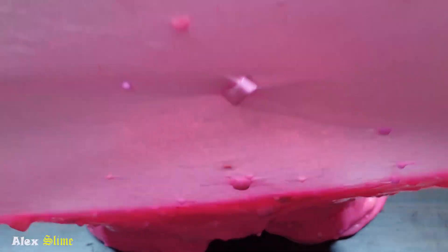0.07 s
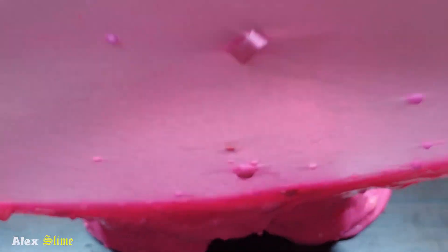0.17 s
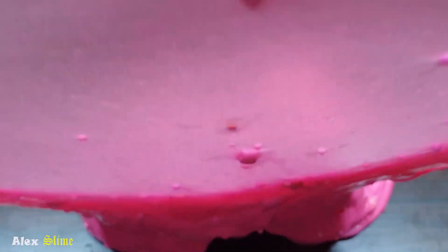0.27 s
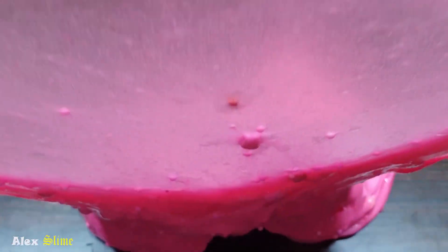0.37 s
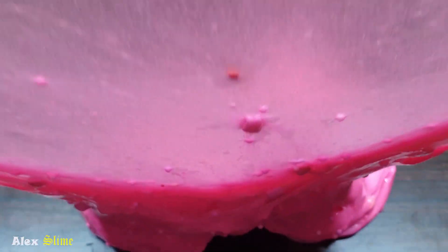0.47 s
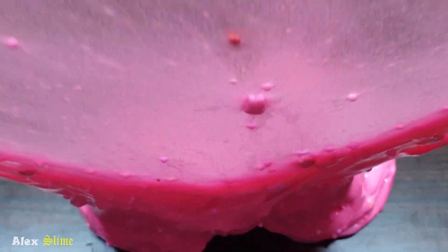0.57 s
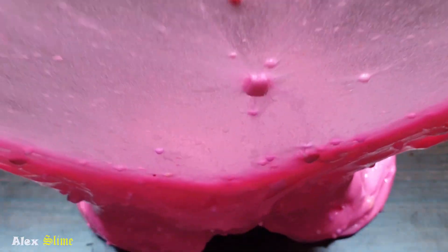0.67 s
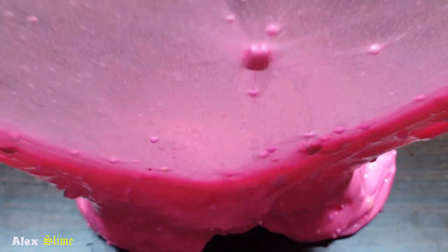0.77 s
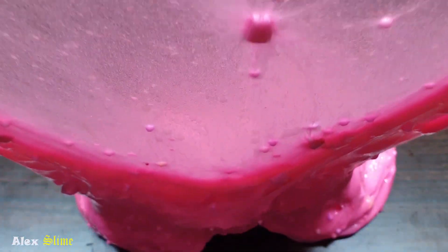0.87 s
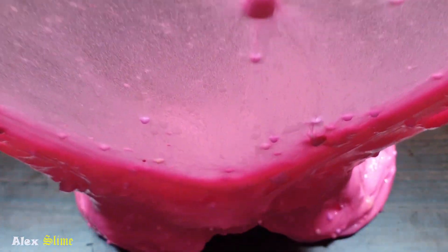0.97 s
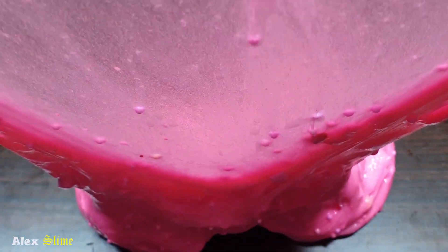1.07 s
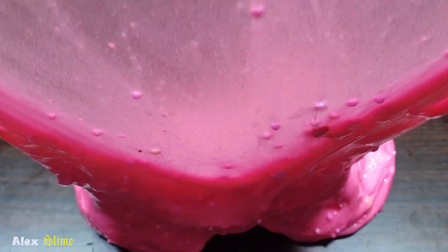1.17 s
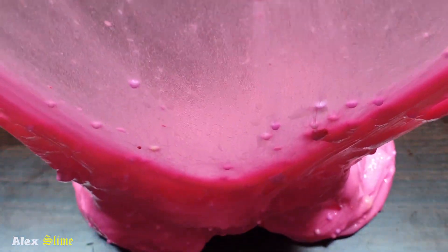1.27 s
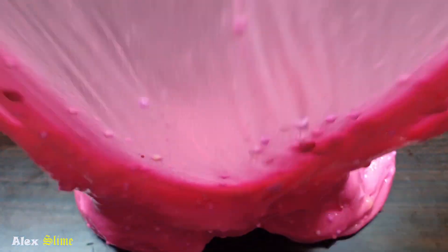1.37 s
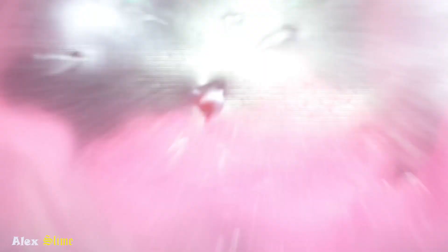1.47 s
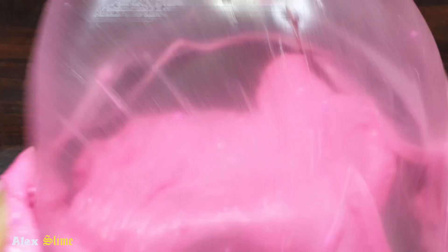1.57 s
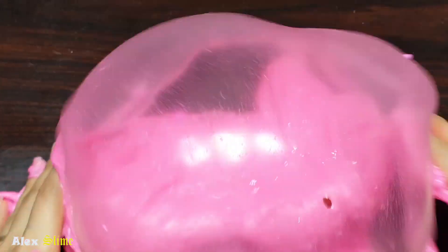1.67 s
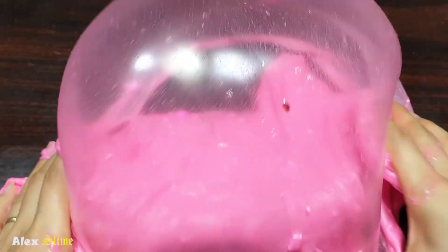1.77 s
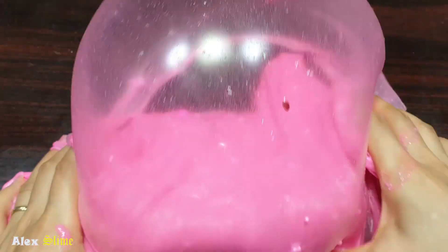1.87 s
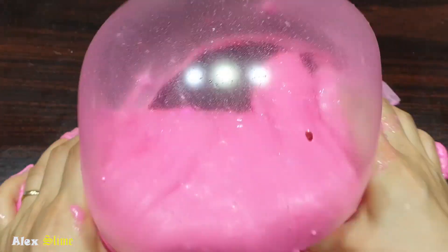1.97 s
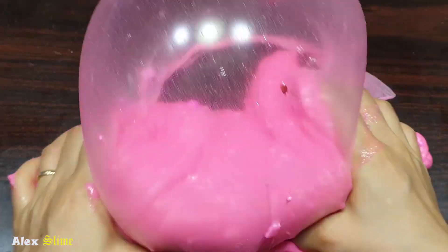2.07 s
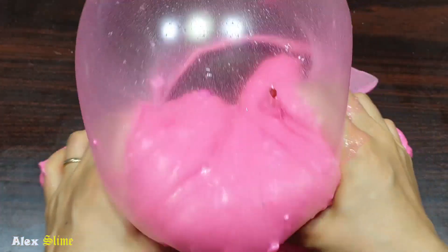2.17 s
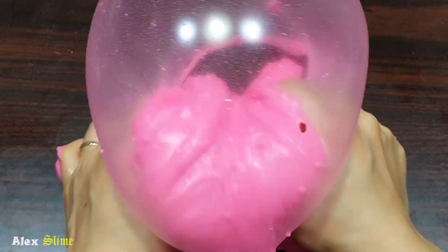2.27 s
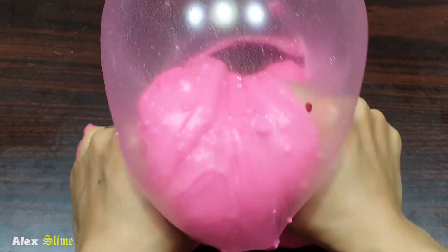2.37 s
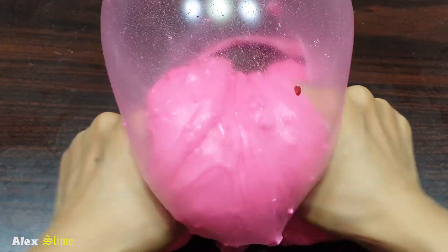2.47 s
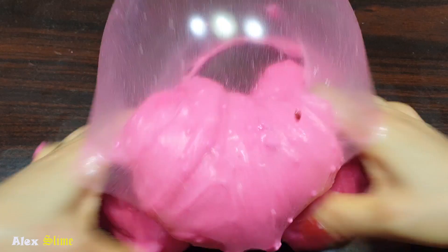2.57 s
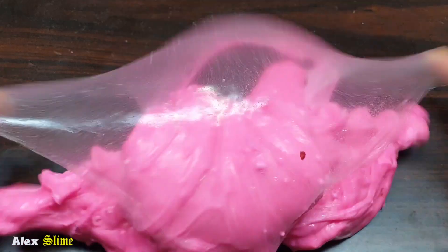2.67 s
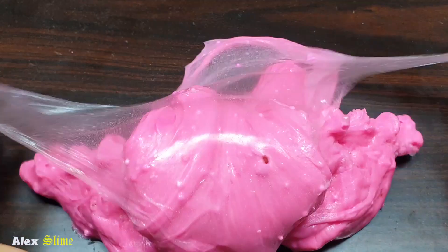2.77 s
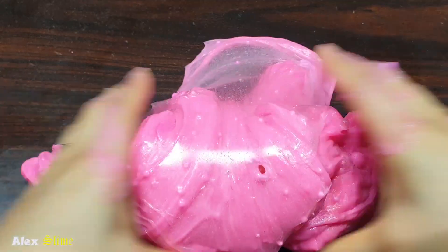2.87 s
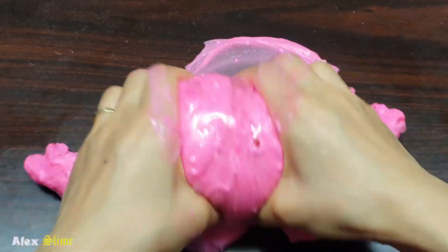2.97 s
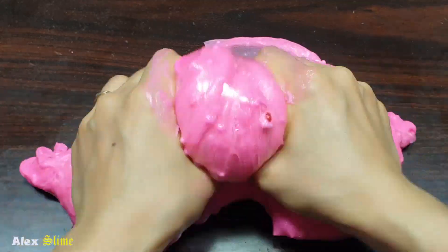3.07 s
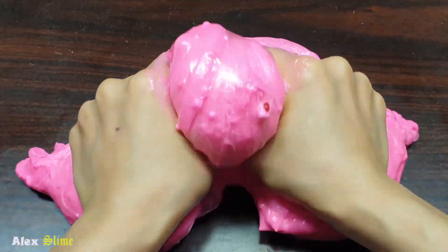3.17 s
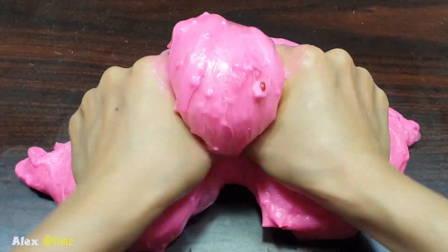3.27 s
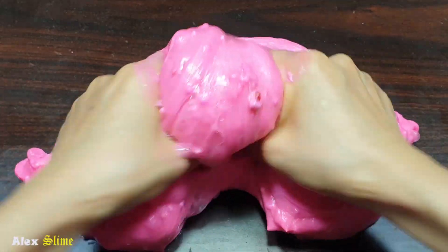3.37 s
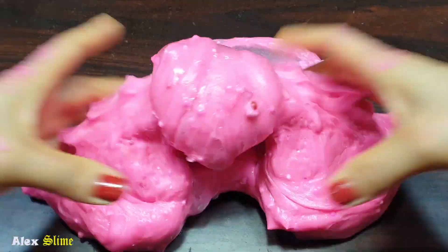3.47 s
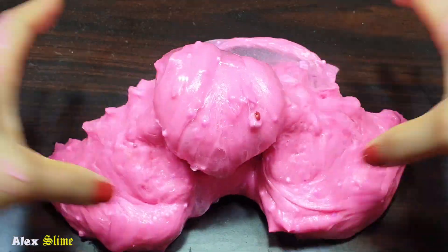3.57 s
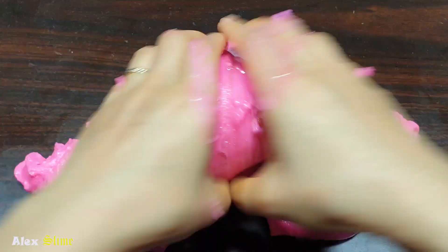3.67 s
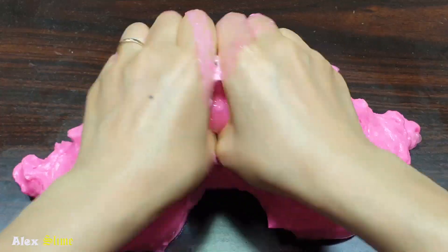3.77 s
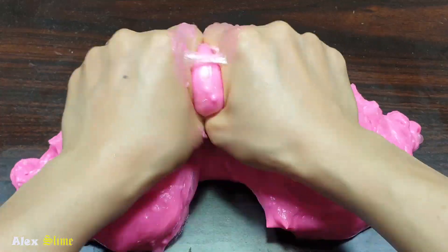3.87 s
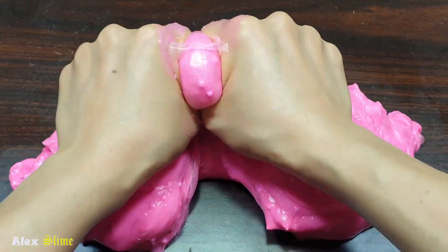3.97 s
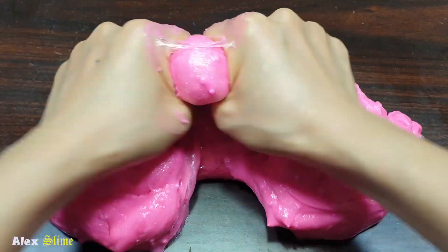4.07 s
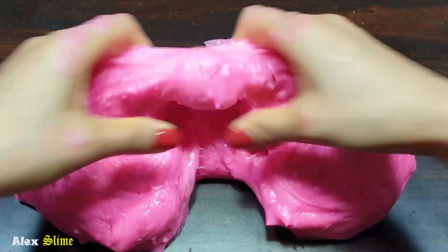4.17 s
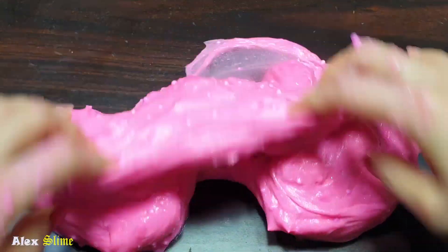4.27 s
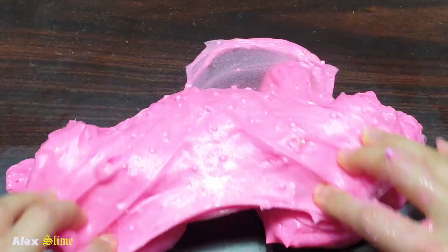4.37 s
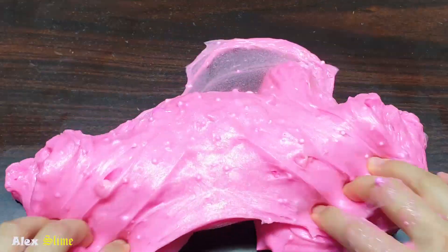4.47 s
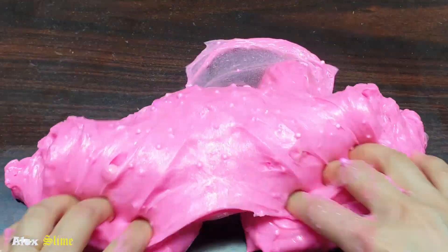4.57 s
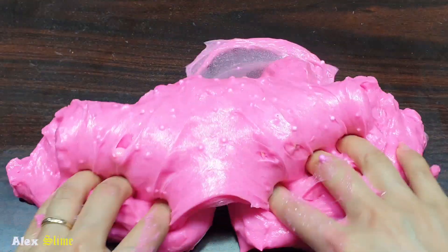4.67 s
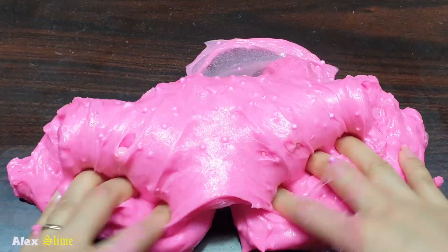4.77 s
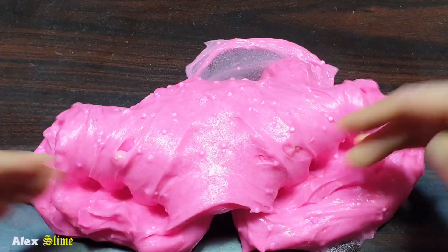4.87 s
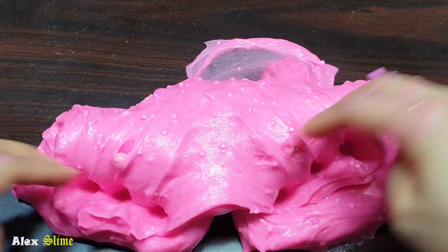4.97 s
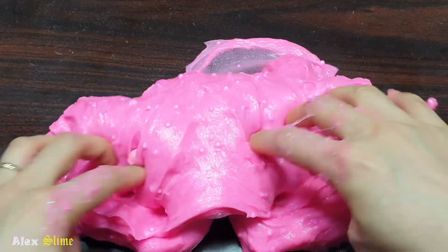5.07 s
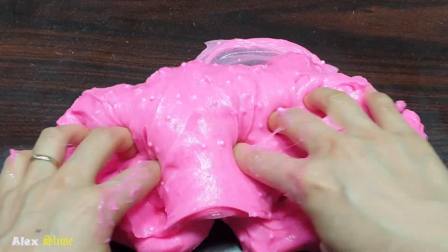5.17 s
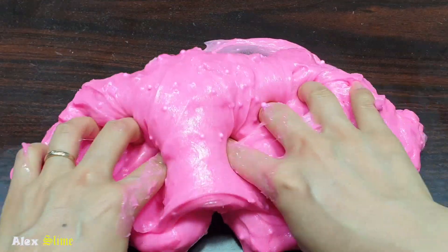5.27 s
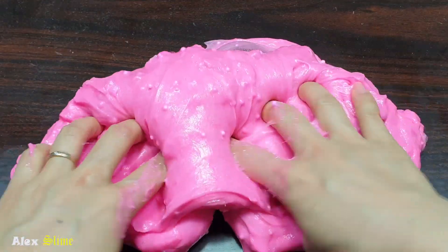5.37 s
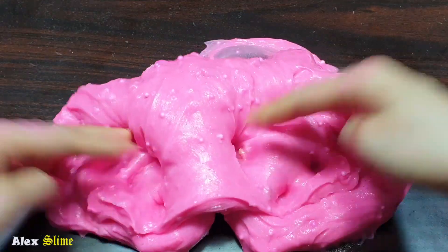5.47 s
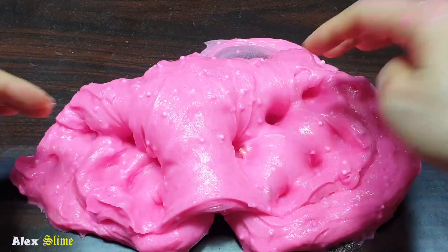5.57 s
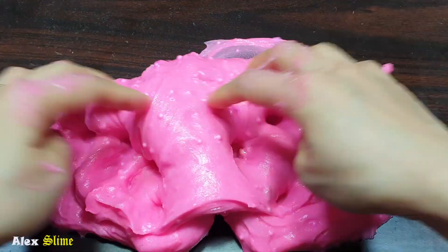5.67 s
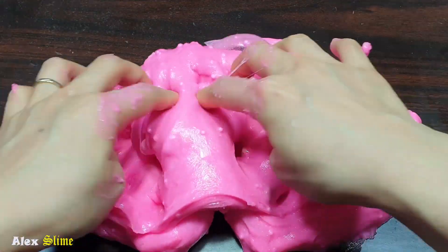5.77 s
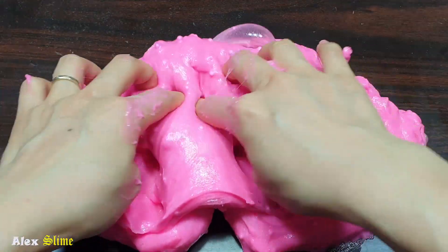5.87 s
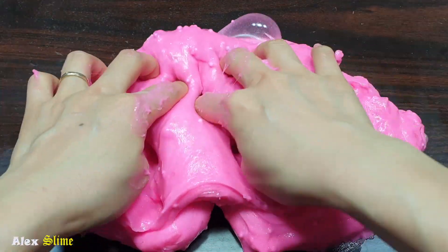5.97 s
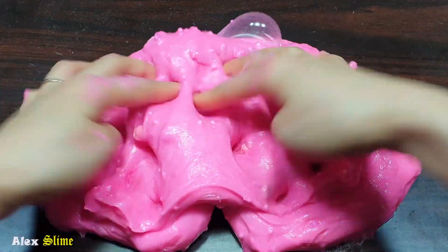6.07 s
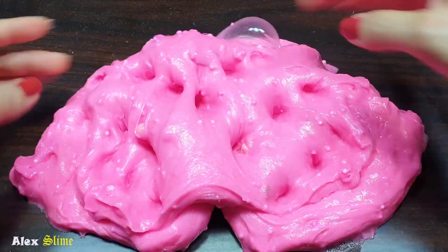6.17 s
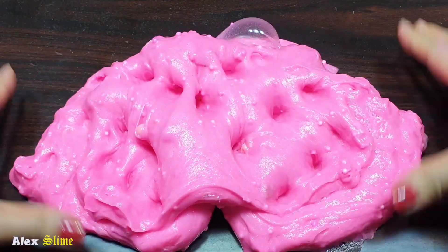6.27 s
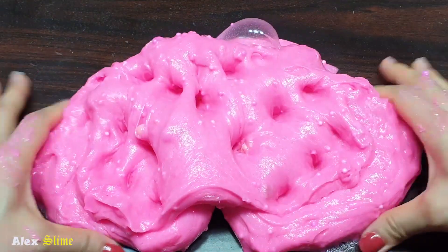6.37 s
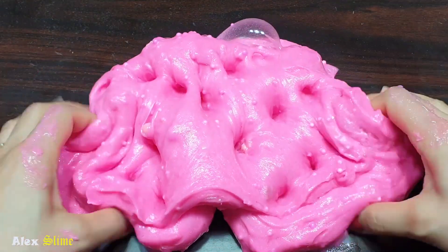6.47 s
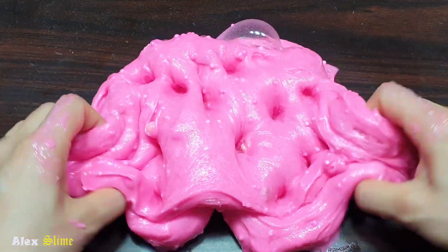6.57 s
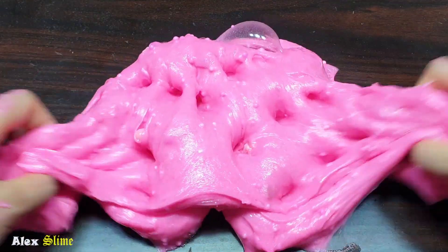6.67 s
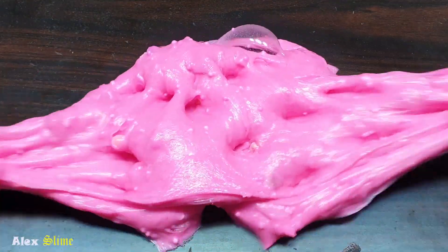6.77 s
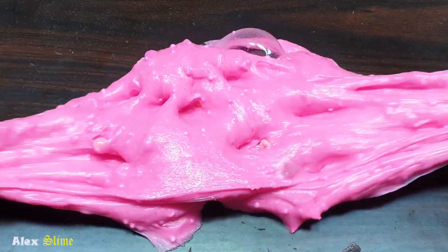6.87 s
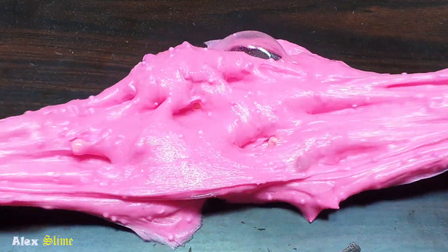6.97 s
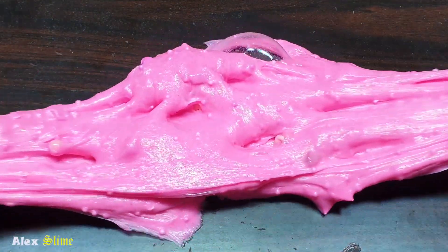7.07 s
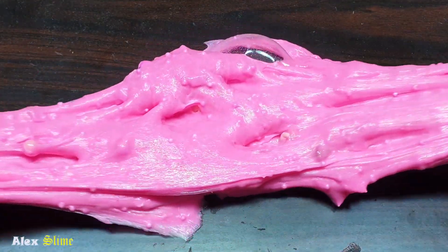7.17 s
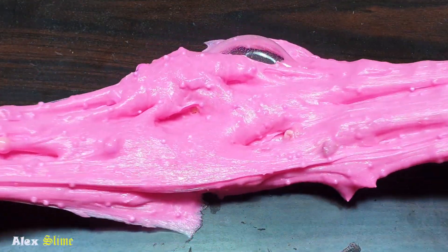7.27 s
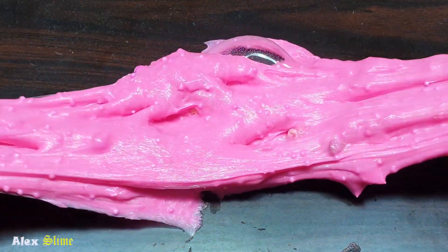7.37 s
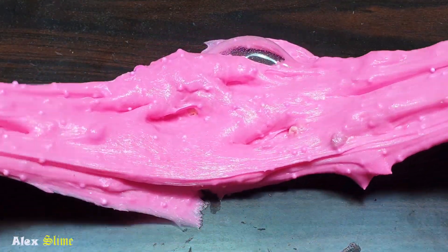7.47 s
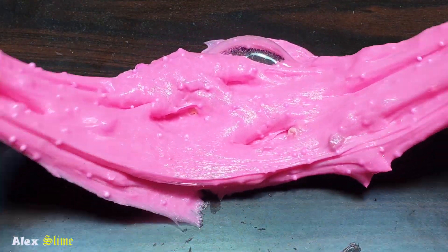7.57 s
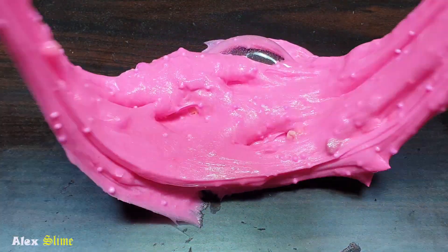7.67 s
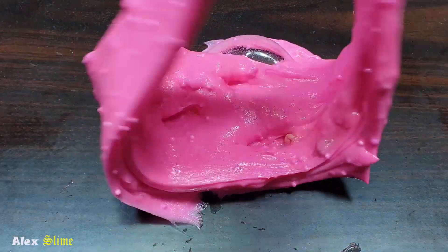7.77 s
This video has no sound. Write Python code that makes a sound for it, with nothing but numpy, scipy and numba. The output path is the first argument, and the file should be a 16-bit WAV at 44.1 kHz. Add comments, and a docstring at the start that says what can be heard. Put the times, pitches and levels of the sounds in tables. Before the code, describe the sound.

A stretched slime sheet flops down with a low puff and sharp bursting crack, followed by clustered bubble snaps, wet squelches and sticky crackling.

```python
"""Kneading beaded slime

Hands knead thick, sticky slime with small beads on a table, close to a stereo microphone in a small room.
A stretched sheet lands with a puff of air (low noise) and a loud burst (torn noise and a crack).
Trapped bubbles pop (noise snap, ringing cavity), wet skin crackles and deep pockets squelch (grain clouds).
A few faint whines (wavering tones) sound over rumble and hiss."""
import sys
import numpy as np
from scipy import signal
from scipy.fft import rfft, irfft
from scipy.io import wavfile
from scipy.ndimage import uniform_filter1d
from numba import njit

SR = 44100
rng = np.random.default_rng(int(sys.argv[2]) if len(sys.argv) > 2 else 0)


def generate_wav(signal):
    """Clip the signal to [-1, 1] and save it as 16-bit WAV at the path in sys.argv[1]."""
    frames = np.transpose(np.atleast_2d(signal))
    scaled = np.clip(frames, -1, 1) * 32767
    pcm = np.round(scaled).astype(np.int16)
    wavfile.write(sys.argv[1], SR, pcm)


N = 344862
TIME = np.arange(N) / SR


def undb(db):
    """Decibels to gain."""
    return 10 ** (np.asarray(db) / 20)


def unit(x):
    """Scale to rms 1."""
    return x / np.sqrt(np.mean(x ** 2))


def curve(rows):
    """Gain over time from (time_s, level_db) rows, interpolated in dB."""
    time_s, level_db = np.transpose(rows)
    return undb(np.interp(TIME, time_s, level_db, left=-130))


def colour(x, points):
    """Filter by (freq_hz, gain_db) points, interpolated over log frequency."""
    hz, db = np.transpose(points)
    f = np.maximum(np.fft.rfftfreq(x.shape[-1], 1 / SR), 1)
    gain = undb(np.interp(np.log(f), np.log(hz), db))
    return irfft(rfft(x) * gain, x.shape[-1])


def sides(pan_db):
    """Left and right gain; pan_db is left minus right."""
    return undb(np.array([[pan_db], [-pan_db]]) / 2)


def blend(mid, side, likeness):
    """Left and right from two independent noises; likeness is their correlation."""
    common, opposed = np.sqrt(1 + likeness) * mid, np.sqrt(1 - likeness) * side
    return (common + np.array([opposed, -opposed])) / np.sqrt(2)


def pair(size, likeness):
    """Two partly alike white noises."""
    mid, side = rng.standard_normal((2, size))
    return blend(mid, side, likeness)


def add(out, s, sound):
    """Mix a sound in at time s."""
    i = max(int(s * SR), 0)
    out[:, i:i + sound.shape[1]] += sound[:, :N - i]


def sized(x, db, seconds):
    """Give a short sound the energy of a level held for some seconds."""
    energy = np.mean(np.sum(x ** 2, axis=1))
    return x * undb(db) * np.sqrt(seconds * SR / energy)


# spectrum of the background noise: freq_hz, density_db_per_hz (relative)
FLOOR_SPECTRUM = [(25, -26.5), (42, 5), (100, 4), (170, -7), (260, -5.5), (400, -13.5), (1200, -19.5),
                  (2500, -24.5), (5000, -28), (8000, -32.5), (12000, -21.5), (16000, -29.5)]
# slow swell of the rumble: time_s, gain_db
RUMBLE_SWELL = [(0, -63.5), (.45, -72), (.65, -66), (1.3, -63.5), (3, -66), (6, -64), (7.8, -66)]


def background():
    """Low room rumble that swells slowly, under an even microphone hiss."""
    noise = unit(colour(pair(N, likeness=0.5), FLOOR_SPECTRUM))
    rumble = signal.sosfiltfilt(signal.butter(2, 500, fs=SR, output="sos"), noise)
    hiss = noise - rumble
    return rumble * curve(RUMBLE_SWELL) * sides(4.4) + hiss * undb(-66.5)


# reverberation by band: centre_hz, t60_s, level_db (against the direct sound)
ROOM_BANDS = [(150, 0.73, -1), (336, 0.42, -10.5), (515, 0.43, -4), (1420, 0.069, -9.5), (3130, 0.29, -4.5),
              (4800, 0.3, -6), (7900, 0.27, -7), (15000, 0.25, -2.5)]


def room(x):
    """Diffuse reflections build up after the direct sound; the bass is most alike at both ports."""
    t = TIME[:32768]
    f = np.maximum(np.fft.rfftfreq(len(t), 1 / SR), 1)
    mid, side = rfft(rng.standard_normal((2, len(t))))
    noise = blend(mid, side, likeness=1 / (1 + (f / 800) ** 2))
    log_centres = np.log([row[0] for row in ROOM_BANDS])
    response = 0
    for share, (_, t60_s, db) in zip(np.eye(len(ROOM_BANDS)), ROOM_BANDS):
        band = irfft(noise * np.interp(np.log(f), log_centres, share))
        build_up = 1 - np.exp(-(t / 0.0012) ** 2)
        decay = np.exp(-np.log(1000) * t / t60_s) * build_up
        response = response + band * decay * undb(db) / np.sqrt(np.sum(decay ** 2))
    return signal.oaconvolve(x, response, axes=1)[:, :N]


# air pushed past the left port by the falling sheet: time_s, level_db
PUFF_LEVEL = [(1.3, -95), (1.44, -83), (1.485, -37), (1.518, -21), (1.55, -34.5), (1.59, -51), (1.68, -45),
              (1.78, -58), (1.9, -130)]
# taut sheet quivering in the air: time_s, level_db (before panning)
QUIVER_LEVEL = [(.2, -77), (.45, -67), (.7, -62), (1.05, -68.5), (1.35, -74), (1.5, -99)]


def puff():
    """The sheet quivers, then falls; its air buffets the left port far more than the right."""
    wind_spectrum = [(10, -17.5), (25, -4.5), (45, 3.0), (85, -2.5), (140, -11), (300, -28.0),
                     (1000, -70.5), (8000, -110)]
    quiver_spectrum = [(20, -40), (70, -11.5), (95, 0), (125, -4), (400, -50.0), (8000, -110)]
    wind = colour(pair(N, likeness=0.13), wind_spectrum)
    wind /= np.sqrt(uniform_filter1d(wind ** 2, size=2048))  # even level
    quiver = unit(colour(pair(N, likeness=1.0), quiver_spectrum))
    return wind * curve(PUFF_LEVEL) * undb([[0], [-16]]) + quiver * curve(QUIVER_LEVEL) * sides(3)


# faint whines: start_s, end_s, pitch_hz, level_db (before flutter), second_partial_db (against the first)
WHINE_ROWS = [(.72, 0.912, 557, -71, -22), (1.39, 1.564, 795, -66, -14), (4.148, 4.618, 831.4, -55, -18),
              (5.481, 5.933, 1080, -69.5, -15)]
WHINE_TREMBLE_SHARE, WHINE_FLUTTER_DB = .017, 3.4  # rms waver in pitch and level


def whines():
    """Thin, pulsing two-partial tones that swell and fade."""
    waver_spectrum = [(8, -40), (18, 0), (40, 0), (150, -40), (2000, -100)]
    out = np.zeros((2, N))
    for start, end, hz, db, second_db in WHINE_ROWS:
        n = int((end - start) * SR)
        tremble, pulse = unit(colour(rng.standard_normal((2, n)), waver_spectrum))
        phase = 2 * np.pi * np.cumsum(hz * (1 + WHINE_TREMBLE_SHARE * tremble)) / SR
        tone = np.sin(phase) + undb(second_db) * np.sin(2 * phase)
        tone *= undb(WHINE_FLUTTER_DB * pulse)
        add(out, start, tone * signal.windows.tukey(n, .6) * undb(db) * sides(0.84))
    return out


# big blisters tearing open: start_s, level_db, tear_s, treble_db (above 6 kHz), pan_db
BURST_ROWS = [(1.5610, -13.5, .0040, -1.5, 4), (3.2633, -12.5, 0.0015, 9, 2.5)]
# colour of a burst: freq_hz, gain_db
TEAR_SPECTRUM = [(100, -13), (300, 2), (500, -6.5), (900, 3.5), (1400, -0.5), (2200, -1), (3600, 0),
                 (5300, 5), (8000, 0), (16000, -9.5)]


def bursts():
    """A big blister rips open within a few milliseconds, with one sharp crack as the skin lets go."""
    out, t = np.zeros((2, N)), TIME[:2048]
    for s, db, tear_s, treble_db, pan_db in BURST_ROWS:
        rip = pair(len(t), likeness=0.76) * (t / tear_s) ** 2 * np.exp(-4 * t / tear_s)
        crack = np.eye(1, len(t), int(tear_s * SR / 2))  # one impulse at the peak of the rip
        tilted = [(hz, gain + treble_db * (hz > 6000)) for hz, gain in TEAR_SPECTRUM]
        burst = colour(unit(rip) + undb(-8) * unit(crack), tilted)
        add(out, s, sized(burst, db, seconds=0.0049) * sides(pan_db))
    return out


def cavity(hz, cycles, glide, lag_s):
    """An opened bubble swells within a cycle and rings briefly as its pitch rises; the right port lags."""
    turns = np.maximum(TIME[:4096] - np.array([[0], [lag_s]]), 0) * hz
    age = turns / cycles  # 1 at -60 dB
    swell = 1 - np.exp(-(2 * turns) ** 2)
    ring = np.sin(2 * np.pi * turns * (1 + glide * np.minimum(age, 1)))
    return swell * np.exp(-np.log(1000) * age) * ring


# large air pockets giving way: start_s, starting_pitch_hz, level_db (before panning)
GULP_ROWS = [(1.563, 285, -32.5), (2.647, 340, -29), (3.151, 315, -40), (3.262, 394, -33.5),
             (3.4346, 310, -24), (3.831, 415, -38), (3.872, 423, -41), (3.966, 352, -39.5),
             (4.837, 487, -37.5), (4.862, 253, -34.5), (4.87, 505, -43.5), (5.463, 257, -35.5),
             (5.756, 333.4, -53), (6.102, 276.5, -33)]


def gulps():
    """Large pockets give a short, hollow note."""
    out = np.zeros((2, N))
    for s, hz, db in GULP_ROWS:
        note = cavity(hz, cycles=10, glide=.12, lag_s=.00003)
        add(out, s, sized(note, db, seconds=0.0067) * sides(1.8))
    return out


@njit
def grains(starts, poles, sizes, n):
    """Sum of decaying sines, each a rotating complex pole."""
    out = np.zeros(n)
    for k in range(len(starts)):
        z = sizes[k] + 0j
        for i in range(max(starts[k], 0), min(n, starts[k] + int(-7 / np.log(abs(poles[k]))))):
            z *= poles[k]
            out[i] += z.imag
    return out


# kinds of grain: pitch_hz (median), spread_octaves, cycles_to_minus_60_db,
# rate_per_s (at density 1), size_scatter_db
POCKET_GRAINS = (360, 0.33, 21.6, 500, 6.3)
BUBBLE_GRAINS = (1248, 0.21, 13, 600, 4.5)
SMALL_BUBBLE_GRAINS = (4200, 0.88, 10, 1800, 1.4)
CRACKLE_GRAINS = (10160, .42, 44, 2800, 7)


def cloud(kind, density, pan_spread_db, lag_spread_s, size=1024):
    """Countless tiny ringing bursts through the slime, levelled over a window of size samples."""
    hz, octaves, cycles, rate, scatter_db = kind
    count = int(rate * density * N / SR)
    seeds = rng.integers(2 ** 31, size=6)
    when, pitch, force, pan, lag, sign = (np.random.default_rng(seed) for seed in seeds)
    f = hz * 2 ** (octaves * pitch.standard_normal(count))
    poles = np.exp((2j * np.pi - np.log(1000) / cycles) * f / SR)
    sizes = undb(scatter_db * np.minimum(force.exponential(size=count), 4))
    sizes *= sign.choice([-1, 1], count) * np.sqrt(f / hz) * (f < SR / 2)
    s = when.random(count) * N / SR
    # each grain has its own place between the hands
    pan_db = pan_spread_db * pan.standard_normal(count)
    lag_s = lag_spread_s * lag.standard_normal(count)
    out = []
    for side in (1, -1):
        starts = ((s + side * lag_s / 2) * SR).astype(int)
        out.append(grains(starts, poles, sizes * undb(side * pan_db / 2), N))
    out = np.array(out)
    return out / np.sqrt(uniform_filter1d(np.mean(out ** 2, axis=0), size=size) + 1e-6)


def effort(t, start, end, rise, swell_db, fall):
    """Gain of one move of the hands: a quick rise, a slow change while they work, and a fall."""
    along = np.clip((t - start) / max(end - start, 1e-3), 0, 1)
    before_db = abs(rise) * np.maximum(start - t, 0)
    after_db = abs(fall) * np.maximum(t - end, 0)
    return undb(swell_db * (along - 1) - before_db - after_db)


# squelches: start_s, end_s, rise_db_per_s, fall_db_per_s, hollow_hz (under the hand),
# pockets_db, bubbles_db, small_bubbles_db, crackle_db, pan_db
SQUELCH_ROWS = [(2.617, 2.632, 321.5, 201, 2290, -41.5, -33, -33.5, -30, 2),
                (3.424, 3.436, 701.5, 242, 3430, -35.5, -36, -34.5, -30, 3.5),
                (4.171, 4.192, 337, 703, 2470, -50, -44.5, -41, -37, 3.5),
                (4.836, 4.888, 1195, 1192, 3370, -39, -43, -40.5, -39.5, 4.5),
                (5.458, 5.46, 1202.5, 502.5, 5050, -42, -48.5, -41, -33, 4.5),
                (5.492, 5.495, 1205, 599.5, 5300, -33.5, -37, -37, -41, 4),
                (6.102, 6.146, 1102, 382, 4660, -44.5, -53, -48, -41.5, 4.5),
                (7.657, 7.697, 800, 992, 5030, -71, -84, -57, -51.5, 7)]


def squelches():
    """Fingers press in, and air spurts through pockets and bubbles of all sizes at once."""
    layers = [cloud(POCKET_GRAINS, density=2, pan_spread_db=0.5, lag_spread_s=.00003)]
    for kind in (BUBBLE_GRAINS, SMALL_BUBBLE_GRAINS, CRACKLE_GRAINS):
        layers.append(cloud(kind, density=2.8, pan_spread_db=5.5, lag_spread_s=.00005))
    out = np.zeros((2, N))
    for start, end, rise, fall, hollow_hz, *levels_db, pan_db in SQUELCH_ROWS:
        near = (TIME > start - .5) & (TIME < end + .5)
        flow = effort(TIME[near], start, end, rise, 0, fall)
        deep, bubbles, small, crackle = (layer[:, near] for layer in layers)
        # the hollow under the hand rings with the small bubbles
        hollow = signal.lfilter(*signal.iirpeak(hollow_hz, Q=6, fs=SR), small)
        small = unit(small + undb(-1) * hollow)
        mix = sum(undb(db) * layer for db, layer in zip(levels_db, (deep, bubbles, small, crackle)))
        out[:, near] += flow * sides(pan_db) * mix
    return out


# strokes of the hands: start_s, end_s, rise_db_per_s, swell_db (start to end), fall_db_per_s,
# bubbles_db, small_bubbles_db, crackle_db (stirring reached at the end), pan_db
STROKE_ROWS = [(1.495, 1.521, 279.5, -1, 301, -59.5, -52.5, -51.5, 4),
               (1.57, 1.634, 301.5, -1.5, 154, -48.5, -49, -49.5, 2),
               (1.925, 2.185, 145, 8.5, 125, -53.5, -47.5, -46, 3),
               (2.24, 2.427, 195, 13, 212.5, -45.5, -49, -43.5, 2),
               (2.59, 2.748, 200, -2, 176, -80, -68, -54.5, 9),
               (2.991, 3.147, 894, 12, 201, -45, -40, -42.5, 2),
               (3.188, 3.38, 198.5, -9, 101, -77.5, -58, -47.5, 2),
               (3.496, 3.501, 107, 4.5, 654, -48, -38, -35, 4),
               (3.795, 3.808, 381, 5, 350, -47, -34.5, -38, 6),
               (3.907, 3.984, 225, 0, 369, -53.5, -51.5, -40, 3),
               (4.153, 4.244, 205, -1, 220, -57.5, -58.5, -48, 4),
               (4.382, 4.462, 153, 9, 400, -66, -66, -45.5, 7.5),
               (4.584, 4.73, 80, 6, 280, -68, -77, -59, 5),
               (4.817, 4.83, 899.5, 2.5, 160, -62.5, -82, -49, 2),
               (5.927, 5.944, 896, 0.5, 203, -78.5, -88, -67, 16),
               (6.425, 6.479, 498.5, 3, 202, -68.5, -68, -51, 8.5),
               (6.573, 6.579, 245, -4, 147, -55.5, -57, -51.5, 6),
               (6.693, 6.799, 198, -7.5, 203, -53.5, -53, -50.5, 1.5),
               (6.925, 7.099, 150, -9, 72, -83.5, -89, -70, 8.5),
               (7.505, 7.513, 276.5, 0, 149, -85, -86.5, -65, 3)]
BUBBLE_SWELL_SHARE = 0.65  # the deep bubbles follow only this share of the swell


def strokes():
    """How strongly the hands stir the bubbles, the small bubbles and the crackle, left and right."""
    power = np.zeros((3, 2, N))
    for start, end, rise, swell_db, fall, *levels_db, pan_db in STROKE_ROWS:
        near = (TIME > start - .5) & (TIME < end + .5)
        for layer, share, db in zip(power, (BUBBLE_SWELL_SHARE, 1, 1), levels_db):
            gain = effort(TIME[near], start, end, rise, share * swell_db, fall)
            layer[:, near] += (gain * undb(db) * sides(pan_db)) ** 2
    return np.sqrt(power)


def kneading(stir):
    """Sticky skin peels from the fingers in a sparse crackle; deeper pockets stir along with the bubbles."""
    wide = dict(pan_spread_db=4, lag_spread_s=.00006, size=3072)
    bubbles = cloud(BUBBLE_GRAINS, density=1.1, **wide)
    small = cloud(SMALL_BUBBLE_GRAINS, density=.4, **wide)
    crackle = cloud(CRACKLE_GRAINS, density=.4, **wide)
    deep = cloud(POCKET_GRAINS, density=0.59, pan_spread_db=6.5, lag_spread_s=.00004)
    body = stir[0] * (bubbles + undb(-9.5) * deep) + stir[1] * small
    return body * sides(1.2) + stir[2] * crackle * sides(-1.1)


STRAY_PER_S, STRAY_HZ, STRAY_OCTAVES = 40, 1422, 0.28  # candidates; the weakest are dropped
STRAY_RING_DB, STRAY_SNAP_DB = -3.5, 4.5  # against the stirred bubbles and crackle
STRAY_SCATTER_DB, STRAY_PAN_DB = 3.5, 3


def stray_pops(stir):
    """Lesser pops at random moments, as strong as the hands are working; rows as in POP_ROWS."""
    rows = []
    draws = rng.standard_normal((int(STRAY_PER_S * N / SR), 5))
    for i, (when, pitch, ring, snap, pan) in enumerate(draws):
        s = np.clip((i + when) / STRAY_PER_S, 0, TIME[-1])
        bubbles_db, _, crackle_db = 20 * np.log10(stir[:, :, int(s * SR)].mean(axis=1) + 1e-9)
        ring_db = bubbles_db + STRAY_RING_DB + STRAY_SCATTER_DB * np.clip(ring, -2, 2)
        snap_db = crackle_db + STRAY_SNAP_DB + STRAY_SCATTER_DB * np.clip(snap, -2, 2)
        if snap_db > -75:
            hz = STRAY_HZ * 2 ** (STRAY_OCTAVES * pitch)
            rows.append((s, hz, ring_db, snap_db, STRAY_PAN_DB * pan))
    return rows


# clearest bubbles popping: start_s, cavity_hz (starting pitch), ring_db, snap_db (skin), pan_db
POP_ROWS = [(1.4449, 3830, -64, -44, 10), (1.5345, 790, -47.5, -48, -7.5), (1.5523, 880, -33.5, -46, 5),
            (1.637, 4100, -37.5, -38, 2.5), (1.669, 1900, -35.5, -51, 0), (1.9453, 1780, -67, -38.5, -6),
            (1.972, 1280, -42, -59, 1.5), (2.004, 1180, -44.5, -36.5, -1), (2.0462, 1350, -41.5, -50, 6),
            (2.118, 1430, -44, -37.5, 14.5), (2.132, 2500, -39, -31.5, 4), (2.1634, 1080, -37.5, -37, -5),
            (2.214, 3870, -63, -33, -6), (2.221, 1610, -31.5, -32.5, 1), (2.243, 1310, -28.5, -53.5, 4),
            (2.268, 1630, -36.5, -46, -1), (2.3128, 1640, -47, -35.5, 3), (2.3477, 1430, -33.5, -34.5, 4),
            (2.3977, 1180, -51.5, -32, -1), (2.416, 1470, -43.5, -37.5, 5.5), (2.5924, 1220, -46, -32, 3),
            (2.639, 1070, -28, -28, 9.5), (2.7371, 1150, -62.5, -33.5, 5.5),
            (2.9973, 1120, -30.5, -43.5, 9), (3.0139, 1460, -30.5, -28, 3.5), (3.081, 1540, -36.5, -54, 3),
            (3.0887, 1260, -30.5, -26, -3.5), (3.1066, 2720, -37.5, -30.5, 8), (3.14, 3140, -35, -37, 3),
            (3.155, 2720, -36.5, -24.5, 8.5), (3.274, 3900, -50, -26.5, -5.5),
            (3.4187, 3480, -25.5, -35.5, -2.5), (3.428, 3300, -26.5, -28.5, 4),
            (3.437, 3350, -33.5, -35, -5.5), (3.758, 3400, -52, -41, 8), (3.7636, 1780, -38, -34, 3.5),
            (3.7947, 2570, -22, -34.5, 4.5), (3.809, 1610, -25.5, -45, -2), (3.8154, 3180, -25.5, -20.5, 3),
            (3.831, 3620, -47, -44, 13.5), (3.872, 1240, -31.5, -24.5, 2.5), (3.8798, 3900, -45, -25, 8.5),
            (3.9194, 2400, -35.5, -30.5, 6), (4.355, 1200, -67, -40, 1), (4.4625, 840, -63, -38, 3),
            (4.636, 1107, -52, -63, 14.5), (4.6422, 2370, -49, -48.5, 5.5), (4.7388, 950, -69, -56, 7),
            (4.7987, 1440, -73, -51, 5), (4.8124, 1400, -69, -43, 0), (4.834, 3380, -36, -35.5, 9),
            (4.857, 1040, -34, -36, 0), (5.0666, 3040, -80, -41.5, 4), (5.084, 3340, -81, -46, 1.5),
            (5.208, 4280, -36.5, -54, 8.5), (5.2081, 2570, -31.5, -48, 4.5), (5.214, 3900, -56, -43, 2),
            (5.22, 1290, -44.5, -37.5, 1.5), (5.495, 2210, -29, -26.5, 2), (5.9234, 1090, -67.5, -49, 8),
            (6.1216, 1490, -47, -29, 2), (6.425, 733, -65.5, -43.5, 7), (6.547, 1150, -43, -43.5, 10),
            (6.638, 3980, -62, -31.5, -4), (6.693, 1470, -57, -41, 9), (6.7913, 1250, -46.5, -37.5, -0.5),
            (7.0497, 3600, -69, -51, 5), (7.661, 780, -58.5, -55, 10), (7.693, 2150, -51, -52, 12)]
# the skin snaps duller over a cavity that rings harder: centre at SNAP_RING_DB, and its fall
SNAP_HZ, SNAP_RING_DB, SNAP_OCTAVES_PER_DB = 8800, -47, .02
RING_CYCLES, RING_GLIDE_SHARE = 10, .082


def pops(rows):
    """The skin of a bubble snaps (band of noise), and the cavity under it rings."""
    out, t = np.zeros((2, N)), TIME[:512]
    lead_s = .001  # the snap swells in over the millisecond before its peak
    for s, hz, ring_db, snap_db, pan_db in rows:
        snap_hz = min(SNAP_HZ * 2 ** (SNAP_OCTAVES_PER_DB * (SNAP_RING_DB - ring_db)), 12500)
        edges_hz = np.clip([snap_hz / 1.61, snap_hz * 1.67], 500, SR / 2 - 1000)
        rip = pair(len(t), likeness=.4) * np.exp(-np.abs(t - lead_s) / .0005)
        snap = signal.sosfilt(signal.butter(2, edges_hz, "band", fs=SR, output="sos"), rip)
        ring = cavity(hz, cycles=RING_CYCLES, glide=RING_GLIDE_SHARE, lag_s=.00002)
        add(out, s - lead_s, sized(snap, snap_db, seconds=.006) * sides(pan_db))
        add(out, s, sized(ring, ring_db, seconds=.003) * sides(pan_db))
    return out


PORT_LAG_S = .00006


def scene():
    """The slime's direct sound reaches the right port a little late; each spot has its own reflections."""
    stir = strokes()
    spots = [pops(POP_ROWS + stray_pops(stir)) + whines(), bursts() + gulps(), squelches(), kneading(stir)]
    # the slime's sounds carry little deep bass
    thin = signal.butter(2, 130, "high", fs=SR, output="sos")
    spots = [signal.sosfilt(thin, spot) for spot in spots]
    left, right = sum(spots)
    delay = np.exp(-2j * np.pi * np.fft.rfftfreq(N, 1 / SR) * PORT_LAG_S)
    direct = np.array([left, irfft(rfft(right) * delay, N)])
    return direct + sum(room(spot) for spot in spots) + puff() + background()


TOP_HZ = 15800


def record(dry):
    """The right microphone is a little brighter; the recorder rounds the highest peaks and cuts the top."""
    left = colour(dry[0], [(4500, -0.41), (8000, -5.5), (16000, -1.0)])
    right = colour(dry[1], [(4500, -0.035), (8000, -1.6), (16000, 2.0)])
    rounded = np.tanh(np.array([left, right]))
    return signal.sosfilt(signal.ellip(10, .2, 70, TOP_HZ, fs=SR, output="sos"), rounded)


dry = scene()
out = record(dry)
generate_wav(out)
```